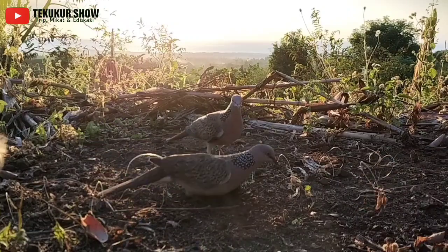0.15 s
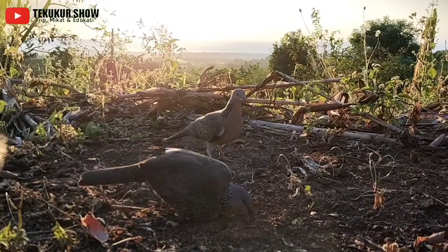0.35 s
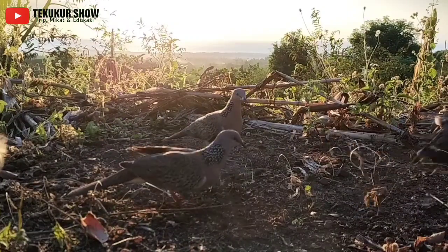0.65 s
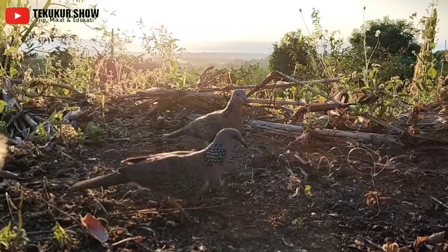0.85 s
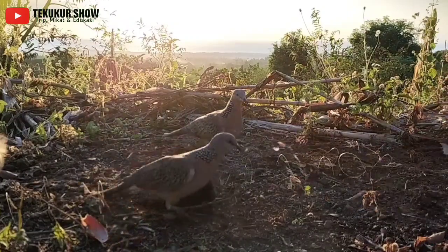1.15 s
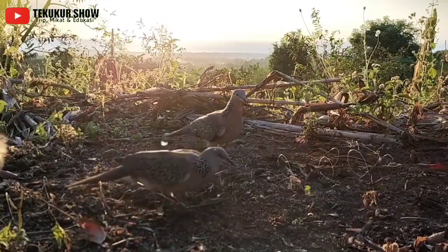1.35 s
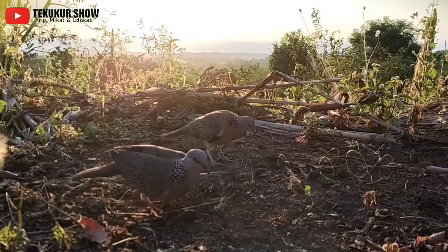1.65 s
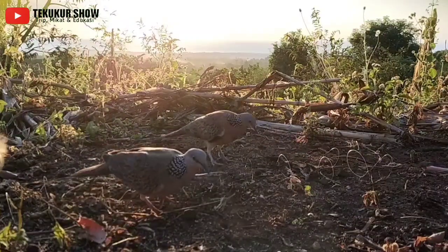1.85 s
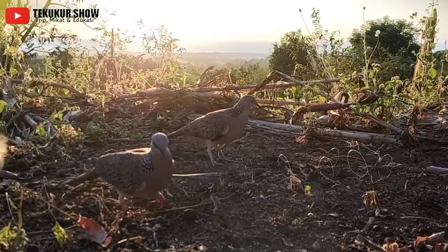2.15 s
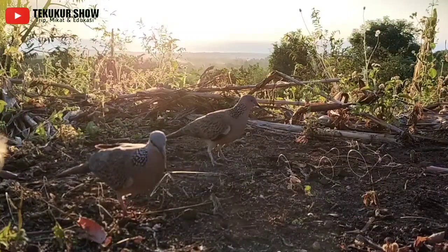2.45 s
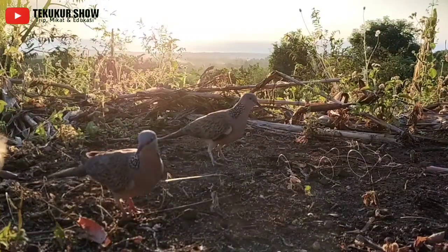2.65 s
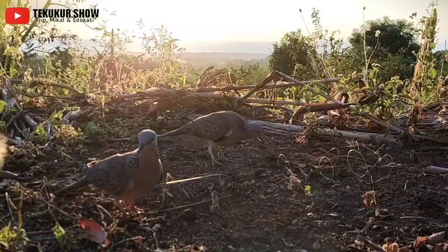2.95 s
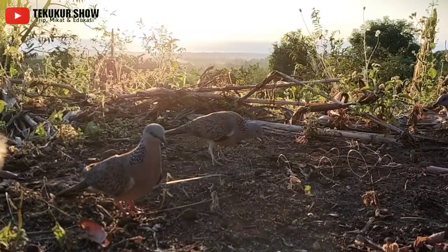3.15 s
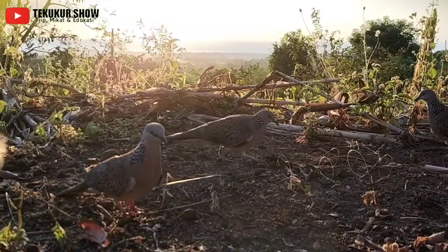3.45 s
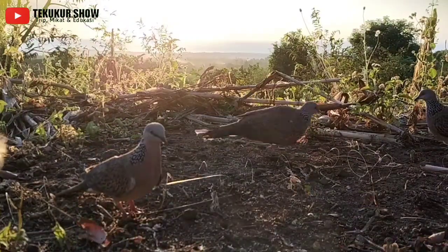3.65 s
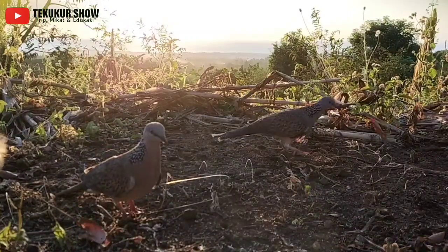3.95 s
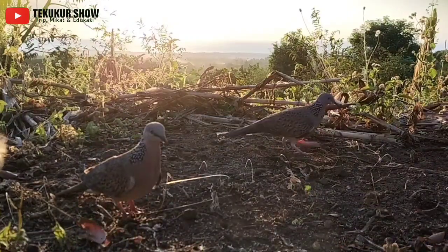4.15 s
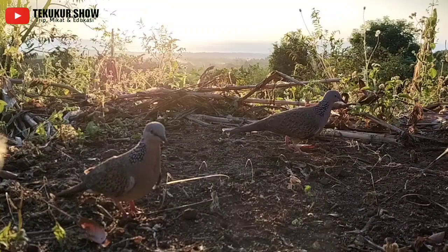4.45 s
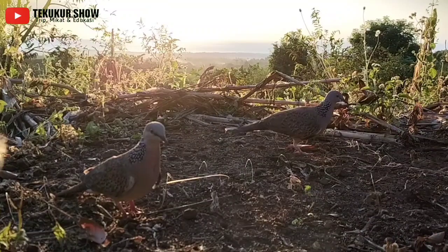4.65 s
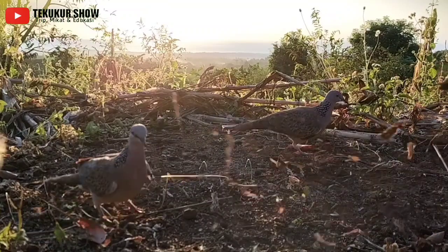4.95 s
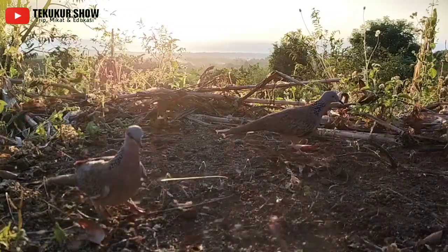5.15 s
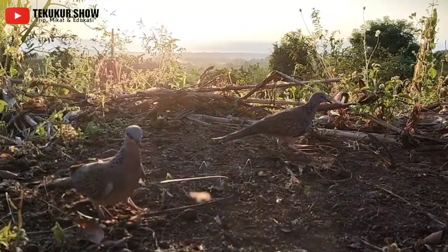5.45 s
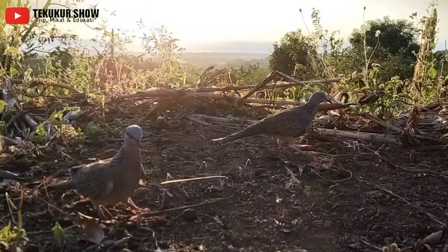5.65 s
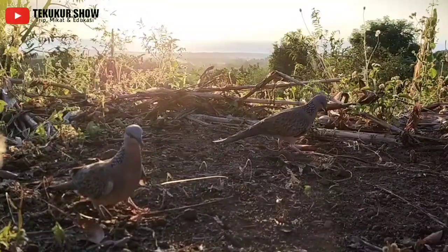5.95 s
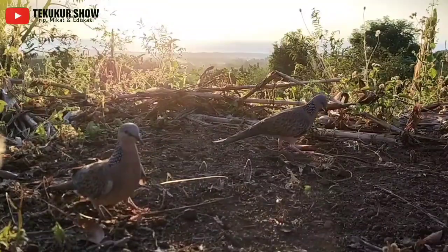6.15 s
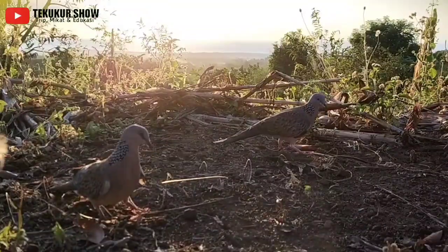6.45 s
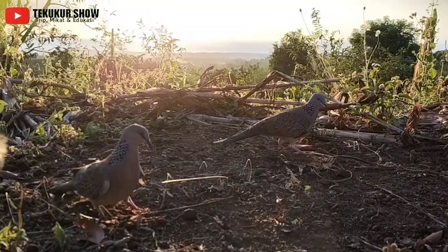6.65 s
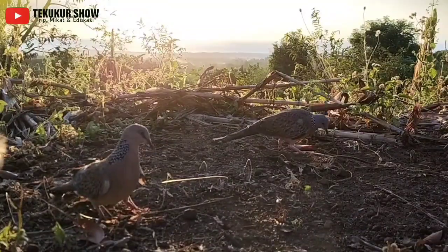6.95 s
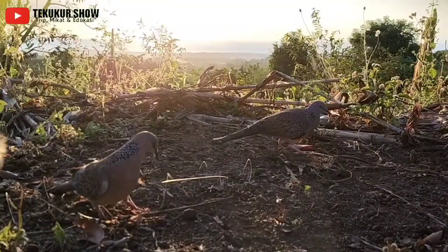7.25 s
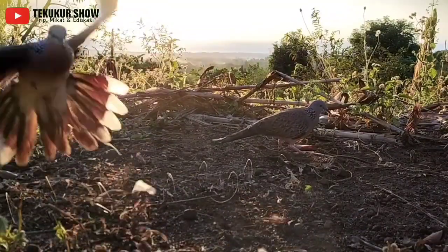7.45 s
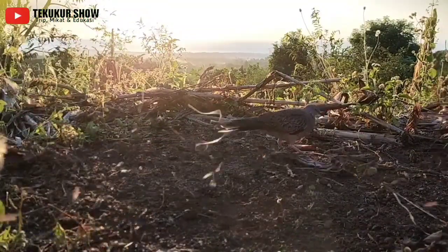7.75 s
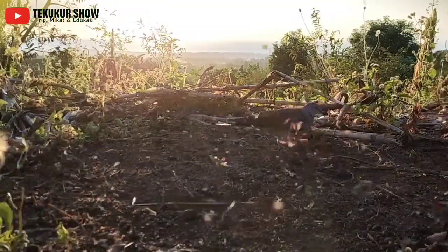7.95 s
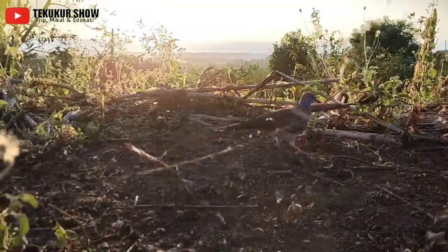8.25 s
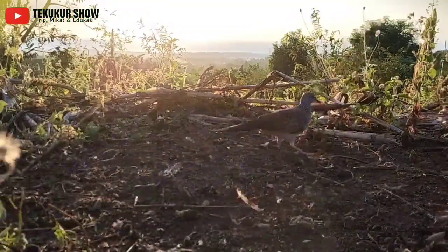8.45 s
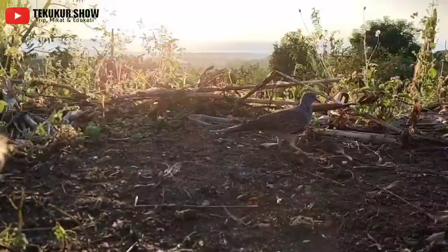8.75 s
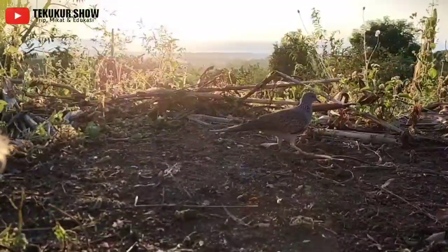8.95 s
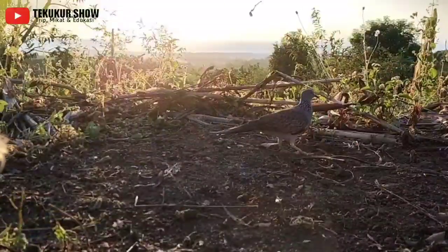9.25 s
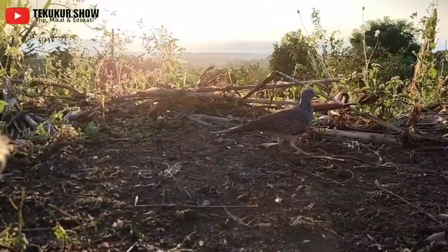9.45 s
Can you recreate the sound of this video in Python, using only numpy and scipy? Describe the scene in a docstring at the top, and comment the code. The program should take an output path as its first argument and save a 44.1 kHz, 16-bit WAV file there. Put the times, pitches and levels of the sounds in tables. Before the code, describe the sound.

Quiet outdoor valley with a low airy hum and faint hiss. Small pecks and steps, mostly slightly left, are broken by two brief flaps with papery claps and rustle. Thin far chirps, descending songbird whistles and a faint motorbike sit behind. Then comes a sudden very close takeoff: buffeting gusts, hollow wing whumps, crackling leaves and twigs, and whirring feathers that ease but continue to the end.

```python
"""Dry ground with scrub in an open valley: doves forage close by, scuffle twice, then take off on whirring wings.
Each wingbeat is a suction-then-push pulse of air with tumbling eddies and a low whump; noise bursts through
resonances make the feather claps and struck twigs, filtered noise the swish, sparse grains the rustle and
sines with hiss the piping. Gliding sines make the small birds, drifting harmonics a distant motorbike, and
coloured noise the open air."""
import sys
import numpy as np
from scipy import signal
from scipy.fft import rfft, irfft
from scipy.io import wavfile
from scipy.ndimage import uniform_filter1d

SR = 44100
rng = np.random.default_rng(int(sys.argv[2]) if len(sys.argv) > 2 else 0)


def file_out(sig):
    """Save sig as 16-bit WAV at sys.argv[1]."""
    # one column per channel
    cols = np.atleast_2d(sig).T
    # limit, then scale
    lim = np.clip(cols, -1, 1)
    pcm = np.round(lim * 32767).astype(np.int16)
    wavfile.write(sys.argv[1], SR, pcm)


N = 422919  # length in samples


# Runs of wingbeats: first beat t/s, count, period/s, first pressure level/dB, last pressure level/dB,
# suction-to-push time/ms, return stroke relative level/dB, return suction-to-push time/ms
WINGBEAT_RUNS = [(0.626, 1, 0.033, -32, -35, 8.6, -17, 9), (0.667, 2, 0.073, -23, -28, 6.3, 6, 5.8),
                 (.916, 1, 0.096, -33, -31, 17, 9, 2.2), (0.9679, 2, 0.074, -16, -20, 3.3, -19, 11),
                 (4.737, 2, 0.083, -28, -12, 9.1, -1.5, 5), (4.894, 2, 0.079, -16, -15.5, 2.8, -4, 13),
                 (5.097, 1, 0.042, -26.5, -31, 1.9, -26, 4.9), (5.764, 1, 0.067, -49, -43, 9.3, -21, 6.6),
                 (7.496, 2, 0.099, -16, -11, 13, -5, 9.9), (7.673, 2, 0.074, -14.5, -17.5, 8.8, 5, 4.6),
                 (7.82, 3, 0.07, -8.5, -10.5, 9.8, -8.5, 4), (8.032, 4, .073, -9.5, -18.5, 10.7, -42, 10),
                 (8.302, 1, 0.092, -20, -20, 4.5, -5, 11), (8.413, 5, 0.077, -21, -26.5, 6.6, -12, 7.1),
                 (8.799, 4, 0.081, -25, -20, 7.2, -5, 5.6), (9.181, 4, 0.088, -21.5, -22, 6.24, -3, 3.7),
                 (9.51, 2, 0.038, -31.5, -32, 6.4, 1, 7.7)]
UNEVEN_DB = 2  # spread of stroke strength


def wingbeats():
    """Periodic excitation: return strokes lag by half a cycle; rows (t/s, pressure level/dB, swing/ms)."""
    strokes = []
    for first_s, count, period_s, first_db, last_db, swing_ms, return_db, return_ms in WINGBEAT_RUNS:
        for s, along in zip(*evenly(first_s, count, period_s)):
            run_db = first_db + (last_db - first_db) * along
            beat_db, back_db = run_db + UNEVEN_DB * rng.standard_normal(2)
            strokes.append((s, beat_db, swing_ms))
            strokes.append((s + period_s / 2, back_db + return_db, return_ms))
    return strokes


def wing_puffs(strokes, sharpness=0.76):
    """Near-field pressure: a passing wing sucks, then pushes; also returns the air's activity (0-1)."""
    puffs, activity = np.zeros(N), np.zeros(N)
    t = np.arange(-SR // 16, SR // 16) / SR
    for s, level_db, swing_ms in strokes:
        u = t / (swing_ms / 2000)  # time in half swings
        broad = u * np.exp((1 - u * u) / 2)
        edge = 2 * u / (1 + u * u) ** 2 * np.pi / 2
        add(puffs, s + t[0], from_db(level_db) * ((1 - sharpness) * broad + sharpness * edge))
        add(activity, s + t[0], np.exp(-(t / 0.065) ** 2))
    return puffs, np.minimum(activity, 1)


# Spectrum of tumbling air at the microphone: f/Hz, relative level/dB
EDDY_SPECTRUM = [(10, -6), (30, 8.5), (60, -0.5), (120, -4), (220, -21), (450, -30), (1000, -55.5)]


def eddies(puffs, gain_db=-8.0, linger_s=0.038, growth=0.67):
    """Turbulence: air keeps tumbling over the microphone after each wingbeat, then settles."""
    r = np.exp(-1 / (linger_s * SR))
    strength = signal.lfilter([1 - r], [1, -r], np.abs(puffs))
    settled = strength / (strength + 0.0013)  # weak motion dies away faster
    return from_db(gain_db) * strength ** growth * settled * colour(rng.standard_normal(N), EDDY_SPECTRUM)


def wing_whumps(strokes, whump_hz=216.6, whump_q=0.91, length_s=0.014, growth=0.87):
    """Damped resonance: the flexing wing adds a soft, hollow whump, louder when the beat is hard."""
    swell = np.zeros(N)
    t = np.arange(-SR // 16, SR // 16) / SR
    for s, pressure_db, _ in strokes:
        level_db = -37 + growth * (pressure_db + 20)
        add(swell, s + t[0], from_db(level_db) * np.exp(-(t / length_s) ** 2))
    return swell * rms_one(resonate(rng.standard_normal(N), whump_hz, whump_q))


# Light strikes of litter thrown up by the take-off: start and end t/s, rate per_s in 1/s,
# crack, knock, sizzle and slap levels/dB before the part gains, crack and knock f/Hz, spread of level/dB
DEBRIS_SETTINGS = dict(start=7.55, end=9.59, per_s=8, crack_db=-37, crack_hz=2300, knock_hz=900, knock_db=-46, sizzle_db=-54, slap_db=-34, spread_db=2.5)


def debris():
    """Random impacts: flying litter strikes with its own strength and pitch; rows as in the clap table."""
    d, rows = DEBRIS_SETTINGS, []
    for s, (hard, small, heavy) in at_random(d):
        pitch = 2 ** np.clip(0.35 * small, -1, 1)
        hard_db, heavy_db = d["spread_db"] * hard, d["spread_db"] * heavy
        rows.append((s, d["crack_db"] + hard_db, d["crack_hz"] * pitch, d["knock_hz"] * pitch,
                     d["knock_db"] + heavy_db, d["sizzle_db"] + hard_db, d["slap_db"] + hard_db))
    return rows


# Loudest feather claps and struck twigs, levels before the part gains: t/s, nominal crack peak level/dB,
# crack f/Hz, knock f/Hz, knock level/dB, sizzle level/dB, slap peak level/dB
CLAP_EVENTS = [(0.584, -39, 3050, 900, -46, -48, -22.5), (0.614, -56, 2700, 360, -32, -64, -36),
               (0.668, -28, 2400, 426, -25.5, -37.5, -22), (0.7405, -27.5, 3370, 450, -31, -46, -20.5),
               (0.781, -39, 3450, 428, -36, -47, -26), (0.814, -44, 3750, 990, -60, -56, -31),
               (0.9663, -30, 3450, 640, -36, -36, -29), (1.039, -32.5, 3280, 604, -34, -45, -30),
               (4.801, -43, 2300, 780, -37.5, -65, -33), (4.8749, -29.5, 3100, 734, -32.5, -59, -33),
               (4.951, -48, 2450, 940, -40, -57, -24), (4.968, -30.5, 3300, 664, -32, -34, -12.5),
               (5.006, -37.5, 3400, 510, -28.5, -44, -20), (5.03, -57, 2400, 467, -34.5, -62, -31),
               (5.0759, -44, 3400, 556, -41.5, -38.5, -24), (5.0827, -32, 3700, 443, -35.5, -49, -28),
               (7.5013, -29, 2800, 500, -41.5, -36.5, -17.5), (7.556, -38, 2300, 550, -38.5, -52, -40),
               (7.653, -31, 1450, 850, -32, -55, -16), (7.7086, -19, 1710, 470, -30.5, -39, -15.5),
               (7.8227, -38, 2450, 664, -30.5, -35.5, -11), (7.929, -37, 2350, 400, -38, -39.5, -21),
               (7.9557, -23.5, 2104, 550, -37, -46, -18), (7.981, -25, 1980, 960, -25, -48, -19),
               (8.0246, -29.5, 2300, 452, -39, -43, -35), (8.1043, -42, 2300, 541, -56, -57, -37),
               (8.116, -36.5, 3000, 700, -58, -32, -33), (8.182, -26.5, 1670, 700, -46, -40, -21.5),
               (8.247, -29.5, 2020, 750, -31, -39, -23), (8.2832, -35, 1750, 760, -29.5, -58, -26),
               (8.299, -20.5, 2630, 800, -49, -43, -15), (8.3426, -29, 2830, 720, -42, -35, -24),
               (8.3577, -29, 2730, 770, -28, -48, -14), (8.422, -34, 2800, 1100, -40.5, -46, -30),
               (8.482, -28, 2100, 800, -39, -41.5, -24), (8.636, -31.5, 1890, 900, -48, -47, -30),
               (8.706, -32, 1720, 1350, -51, -70, -36), (8.745, -43, 2200, 680, -38, -68, -38),
               (8.7922, -37.5, 2252, 910, -49, -59, -25), (8.842, -38, 2240, 1000, -42, -62, -24),
               (8.865, -29.5, 2150, 1070, -36, -60, -30), (8.916, -28, 2500, 483, -34.5, -49, -19),
               (8.921, -24.5, 2700, 925, -35, -45, -27), (8.9604, -27.5, 1790, 940, -40, -44, -19),
               (9.041, -26.5, 2150, 650, -47, -52, -34), (9.071, -36, 2150, 700, -35.5, -52, -25),
               (9.1828, -26, 2620, 493, -53, -48, -29), (9.196, -28, 2000, 900, -39, -40.5, -21),
               (9.2885, -24, 2430, 970, -27.5, -32, -16.5), (9.3922, -30.5, 2600, 700, -44, -40.5, -25),
               (9.431, -21.5, 2420, 595, -46, -43, -19.5)]
CREST_DB = 11.5  # nominal crack peak above its rms
CONTACT_MS, CONTACT_AT_DB, CONTACT_HALVES_DB = 3.8, -26, 17  # a harder blow is over sooner


def feather_claps(lead_ms, pan_db, knock_gain_db=-3.0, sizzle_gain_db=-4.5, slap_gain_db=-1.0,
                  slap_width=1.38, tail_s=0.013, tail_db=-24.0, swell_db=-20.0, grain_db=7.0, top_db=-5.0):
    """Impact excitation: wing tips hit, each noise burst swelling briefly before its peak; trapped air slaps."""
    out = np.zeros((2, N))
    t = np.arange(-SR // 50, SR // 10) / SR
    for s, peak_db, crack_hz, knock_hz, knock_db, sizzle_db, slap_db in list(CLAP_EVENTS) + debris():
        contact_ms = CONTACT_MS * 2 ** ((CONTACT_AT_DB - peak_db) / CONTACT_HALVES_DB)
        u = t / (min(contact_ms, 8) / 1000)  # time in contact lengths
        impact = np.exp(-(1.38 * u - .4) ** 2) + from_db(tail_db) * np.exp(-np.abs(t) / tail_s)
        swell = from_db(swell_db) * np.exp(-np.abs(t) / 0.0082)
        white, grain = rng.standard_normal((2, 3, len(t)))
        grainy = white * from_db(grain_db * np.minimum(grain, 2))
        burst = grainy * np.where(t < 0, swell, impact)

        knock = resonate(burst[0], knock_hz, 1.0)
        crack = resonate(burst[1], crack_hz, 1.0)
        # the vanes sizzle
        sizzle = band(burst[2], 5800, 7500) + from_db(top_db) * band(burst[2], 8500, .45 * SR)
        knock = from_db(knock_db + knock_gain_db) * rms_12ms_one(knock)
        crack = from_db(peak_db - CREST_DB) * rms_12ms_one(crack)
        sizzle = from_db(sizzle_db + sizzle_gain_db) * rms_12ms_one(sizzle)

        # the slap is one pointed pulse, narrower when the knock is higher
        away = np.abs(t - .0012) * 2 * np.pi * knock_hz / slap_width
        slap = from_db(slap_db + slap_gain_db) * (away - 1) * np.exp(-away)
        lead, pan = lead_ms[round(s * SR)], pan_db[round(s * SR)]
        add(out, s + t[0], place(knock + slap, 0.57 * lead, -0.48) + place(crack + sizzle, lead, pan))
    return out


# Piping of stiff flight feathers: first t/s, count, period/s, f/Hz, first level/dB, last level/dB,
# levels before the layer gain
PIPING_RUNS = [(7.505, 1, .074, 2400, -44, -47), (7.583, 6, 0.059, 2330, -41.5, -43),
               (8.027, 4, 0.071, 2270, -37.5, -51), (7.62, 4, 0.077, 1070, -48, -38),
               (7.913, 3, 0.064, 1100, -36.5, -38), (8.211, 5, 0.072, 1080, -41, -51),
               (8.445, 2, 0.12, 2260, -49, -41), (8.618, 2, 0.28, 1320, -44, -48),
               (8.668, 2, .112, 1800, -50, -49), (9.029, 2, 0.079, 1330, -40, -36.5),
               (8.986, 7, 0.095, 1080, -44, -53), (9.49, 3, 0.041, 2150, -44, -46)]


def feather_piping(gain_db=-0.5, length_s=0.0056, sag_per_s=2.92, detune=0.0415, rough=0.79, uneven_db=0.5):
    """Aeroelastic flutter: a feather edge gives a breathy pip that sags in pitch."""
    out = np.zeros(N)
    t = np.arange(-SR // 30, SR // 30) / SR
    for first_s, count, period_s, hz, first_db, last_db in PIPING_RUNS:
        for s, along in zip(*evenly(first_s, count, period_s)):
            sharp, loud = rng.standard_normal(2)
            pitch = hz * (1 + detune * sharp - sag_per_s * t)
            tone = np.sqrt(2) * np.sin(2 * np.pi * np.cumsum(pitch) / SR)
            hiss = rms_one(resonate(rng.standard_normal(len(t)), hz, 1.2))
            level_db = gain_db + first_db + (last_db - first_db) * along + uneven_db * loud
            add(out, s + t[0], from_db(level_db) * np.exp(-(t / length_s) ** 2) * (tone + rough * hiss))
    return out


def twig_knocks(per_s=150, size_db=4.5, cycles=10, count=48):
    """Modal ringing: loose twigs and leaves knock at random, each ringing briefly at its own pitch."""
    sizes = from_db(size_db * np.minimum(rng.exponential(1, N), 2))
    hits = (rng.random(N) < per_s / SR) * sizes * rng.choice([-1, 1], N)
    dealt = rng.integers(0, count, N)  # which twig is hit
    pitches = np.concatenate([np.geomspace(650, 1200, count // 2), np.geomspace(1800, 3100, count // 2)])
    out = np.zeros(N)
    for k, hz in enumerate(pitches):
        r = from_db(-60 * hz / (cycles * SR))  # falls 60 dB in this many cycles
        w = 2 * np.pi * hz / SR
        struck = hits * (dealt == k) + 1e-18
        # higher twigs are fainter
        out += signal.lfilter([0, np.sin(w)], [1, -2 * r * np.cos(w), r * r], struck) / hz ** 0.088
    return rms_one(out)


# Stirring in the two scuffles and the take-off, one list each, before the layer gains:
# t/s, swish level/dB, rustle level/dB
STIR_CURVES = [
    [(0.0, -53.5, -67), (0.216, -68.5, -69.5), (0.434, -53.5, -63.5), (0.568, -55, -68.5),
     (0.838, -59, -62), (0.944, -52, -67.5), (1.122, -54, -65), (1.286, -62.5, -70), (1.5, -69, -70.5)],
    [(4.6, -88, -79), (4.78, -47, -68), (4.92, -48, -64), (4.96, -48, -62.5), (5.016, -46, -68),
     (5.108, -52, -61.5), (5.324, -64, -59.5), (5.576, -67.5, -66.5), (5.8, -65, -73)],
    [(7.35, -69, -70.5), (7.5, -54, -66.5), (7.69, -46.5, -55), (7.84, -32, -54), (7.99, -48, -53.5),
     (8.15, -47, -64), (8.69, -49.5, -69), (9.11, -45.5, -68), (9.59, -47.5, -68.5)],
]
# Air through the wing feathers: f/Hz, relative level/dB
SWISH_SPECTRUM = [(110, 12), (220, 2.5), (450, -7.5), (750, -8.5), (1150, -11), (1450, -9), (2200, -32.5)]
# Crackle of feathers and dry leaves: f/Hz, relative level/dB
RUSTLE_SPECTRUM = [(760, -52), (1300, -21), (1910, -15), (2400, -5), (2850, -13), (4060, -8.5), (5220, -17),
                   (7140, -14.5), (8440, -23.5), (13000, -17), (15800, -22)]
STILL_SWISH_DB, STILL_RUSTLE_DB = -66.5, -72  # below these curve levels nothing stirs


def stirring(activity, lead_ms, pan_db, knocks_db=-3.5, rustle_db=5.5, beat_db=5.0, grains_per_s=700,
             grain_db=2.5, flutter_db=5.0, stroke_db=8.0, spread_ms=0.14):
    """Flow noise and random impacts: air swishes, twigs knock, feathers and leaves crackle in clumps."""
    swish, rustle = np.zeros(N), np.zeros(N)
    t = np.arange(N) / SR
    for rows in STIR_CURVES:
        inside = (t >= rows[0][0]) & (t <= rows[-1][0])
        during = uniform_filter1d(1. * inside, SR // 40)  # soft ends
        low_db, high_db = in_time(rows)
        swish += during * gain_above(low_db, STILL_SWISH_DB)
        rustle += during * gain_above(high_db, STILL_RUSTLE_DB)
    air = from_db(beat_db * activity + 3 * drift(90)) * colour(rng.standard_normal(N), SWISH_SPECTRUM)
    out = place(swish * (air + from_db(knocks_db) * twig_knocks()), 0.77 * lead_ms, -2.4)
    for spot in (-1, 0, 1):
        hits = rng.standard_normal(N) * (rng.random(N) < grains_per_s / SR)
        grains = hits * from_db(grain_db * np.minimum(rng.exponential(1, N), 4))
        crackle = colour(grains * from_db(flutter_db * drift(90)), RUSTLE_SPECTRUM) / np.sqrt(3)
        crackle = crackle * rustle * from_db(rustle_db + stroke_db * activity)
        out += place(crackle, lead_ms + spot * spread_ms, pan_db)
    return out


# Clearest pecks and steps: t/s, nominal peak level/dB before the layer gain, left-right level/dB
TICK_EVENTS = [(0.162, -40.5, 5), (0.208, -37, 5.5), (0.358, -41, 6), (0.421, -38, 5), (0.509, -38, 6.5),
               (0.643, -37, 2), (0.878, -42.5, 2), (1.219, -40.5, 6), (2.124, -51, 5.5), (3.282, -50, 5.5),
               (3.693, -53, 4.5), (3.777, -49.5, 5), (4.112, -48.5, 5.5), (4.344, -46, 6.5),
               (5.136, -47, 4), (5.183, -37.5, 4.5), (5.374, -56, -3), (5.417, -45, 3.5),
               (5.541, -40, -4.5), (6.766, -57, 4), (7.096, -55.5, 5)]
# Faint steps in between: start and end t/s, rate per_s in 1/s, nominal peak level/dB before the layer gain,
# spread of level/dB, left-right level/dB
STEP_SETTINGS = dict(start=0, end=7.3, per_s=1.2, peak_db=-54, spread_db=2, pan_db=4)


def ticks(gain_db=3.5, ring_s=0.0013, thud_db=-8.0, thud_hz=330.0, thud_s=0.013):
    """Impact and soil damping: beaks, claws and grit tap dry litter; the soil beneath thuds softly."""
    out = np.zeros((2, N))
    t = np.arange(SR // 20) / SR
    d = STEP_SETTINGS
    steps = [(s, d["peak_db"] + d["spread_db"] * draw[0], d["pan_db"]) for s, draw in at_random(d)]
    for s, peak_db, pan_db in list(TICK_EVENTS) + steps:
        decay = np.exp(-t / ring_s) + 0.082 * np.exp(-t / 0.023)
        tap = band(rng.standard_normal(len(t)) * decay, 1160, 6300)
        thud = resonate(rng.standard_normal(len(t)) * np.exp(-t / thud_s), thud_hz, 0.56)
        sound = tap / np.abs(tap).max() + from_db(thud_db) * thud / np.abs(thud).max()
        lead_ms = np.clip(0.0575 * pan_db, -.4, .4)
        add(out, s, place(from_db(peak_db + gain_db) * sound, lead_ms, pan_db))
    return out


def chirps(rows, waver, bend=0.25):
    """Frequency modulation: each note is one gliding sine that steepens towards its end."""
    out, wobble = np.zeros(N), drift(300)
    for s, length_s, start_hz, end_hz, level_db in rows:
        u = np.linspace(0, 1, max(round(length_s * SR), 2))
        glide_hz = start_hz + (end_hz - start_hz) * (u + bend * (u ** 4 - u))
        hz = glide_hz * (1 + waver * wobble[round(s * SR):][:len(u)])
        swell = np.sqrt(8 * u * (1 - u))
        add(out, s, from_db(level_db) * swell * np.sin(2 * np.pi * np.cumsum(hz) / SR))
    return out


# Phrases of birds in the far scrub: first t/s, count, gap/s, note length/s, first f/Hz, last f/Hz,
# glide as a share of f, level/dB before the path gains
PHRASES = [(1.775, 1, .425, .055, 2980, 2980, .02, -68.5), (2.2, 1, .2, .04, 3400, 3400, .02, -75),
           (1.89, 2, .135, .095, 2880, 3400, -.14, -67.5), (2.125, 1, .2, .065, 2460, 2460, -.05, -67.5),
           (2.48, 7, .315, .19, 4260, 4290, .01, -73.5), (2.42, 2, .36, .06, 2720, 3050, .03, -72),
           (3.125, 2, .315, .06, 5700, 5400, -.18, -68), (3.245, 2, .325, .07, 5100, 5020, -.03, -66),
           (3.205, 2, .32, .055, 6950, 6780, -.01, -74), (5.785, 1, .66, .075, 3300, 3250, .03, -70),
           (6.2, 1, .2, .085, 4500, 4500, .4, -70), (6.525, 2, .165, .045, 4650, 4600, -.02, -72),
           (6.46, 3, .1, .04, 4250, 3950, -.02, -76), (6.765, 2, .205, .06, 3550, 3600, .07, -64),
           (7.05, 2, .075, .06, 2650, 2900, -.1, -69)]


def far_notes():
    """Repetition: a phrase steps one gliding note up or down; rows (t/s, length/s, f/Hz, f/Hz, level/dB)."""
    notes = []
    for first_s, count, gap_s, length_s, first_hz, last_hz, glide, level_db in PHRASES:
        for s, along in zip(*evenly(first_s, count, gap_s)):
            hz = first_hz + (last_hz - first_hz) * along
            notes.append((s, length_s, hz, hz * (1 + glide), level_db))
    return notes


# A far bird's thin trills of upward flicks: first t/s, count, gap/s, low f/Hz, high f/Hz,
# level/dB before the path gains
TRILL_RUNS = [(1.68, 20, .064, 5600, 6300, -69.5), (5.705, 10, .067, 6000, 6450, -76)]
FLICK_S = 0.0214


def trills():
    """Jittered repetition: no two flicks are alike; rows (t/s, length/s, f/Hz, f/Hz, level/dB)."""
    notes = []
    for first_s, count, gap_s, low_hz, high_hz, level_db in TRILL_RUNS:
        for s in evenly(first_s, count, gap_s)[0]:
            late, sharp, loud = rng.standard_normal(3)
            shift_hz = 110 * sharp
            notes.append((s + 0.0028 * late, FLICK_S, low_hz + shift_hz, high_hz + shift_hz, level_db + 2 * loud))
    return notes


# A nearby songbird's falling whistles: t/s, length/s, start f/Hz, end f/Hz, level/dB before the path gains
WHISTLE_NOTES = [(4.062, .07, 3900, 2600, -69), (4.255, .08, 3900, 2400, -67),
                 (4.447, .08, 3900, 2300, -65), (4.657, .086, 3950, 1950, -56),
                 (4.868, .09, 3950, 1950, -50), (5.085, .09, 3950, 1800, -53), (5.29, .09, 3900, 1850, -52),
                 (5.525, .09, 3900, 1900, -53), (6.682, .052, 3350, 2200, -69),
                 (6.843, .065, 3600, 2100, -63), (7.008, .07, 3500, 2050, -61),
                 (7.165, .082, 3750, 1950, -62), (7.33, .082, 3750, 1950, -58)]


def songbirds():
    """Direct and diffuse paths: song arrives straight and also scattered by the scrub."""
    near = chirps(WHISTLE_NOTES, waver=0.016)
    far = chirps(far_notes() + trills(), waver=0.02)
    near = from_db(-4) * place(near, 0.048, 0.58) + from_db(-2) * scatter(near, t60=0.55)
    far = from_db(-2) * place(far, 0.056, 1.) + from_db(-1) * scatter(far, t60=0.5)
    return near + far


# Motorbike through its gears: t/s, firing rate f/Hz, relative level/dB
BIKE_CURVE = [(0, 127, -4), (1.15, 130, 0), (2.05, 146, 1), (2.18, 140, -14), (2.27, 119, -10),
              (2.42, 117, 0), (2.6, 114.5, 0), (3.6, 116.5, 0), (4.7, 122, 1), (5.3, 124, -4),
              (5.55, 122, -10), (6.0, 108, -2), (6.8, 106, -1), (7.3, 104, -9)]
# Its exhaust pipe: f/Hz, level/dB of a harmonic there before the curve and the fading
EXHAUST_RESPONSE = [(100, -76), (120, -60), (140, -53), (210, -70), (235, -60), (280, -67), (320, -67),
                    (345, -75), (420, -73), (465, -65), (490, -65), (530, -81), (575, -81.5), (640, -81),
                    (800, -97)]


def motorbike(fading_db=2, jitter=0.0039, count=6):
    """Harmonic series: only low firing harmonics carry this far, each fading in the moving air."""
    hz, level_db = in_time(BIKE_CURVE)
    phase = 2 * np.pi * np.cumsum(hz * (1 + jitter * drift(25.57))) / SR
    out = np.zeros(N)
    for k in range(1, count + 1):
        harmonic_db = level_db + at_hz(EXHAUST_RESPONSE, k * hz) + fading_db * drift(10)
        out += np.sqrt(2) * from_db(harmonic_db) * np.sin(k * phase)
    return out


# Open air: f/Hz, relative level/dB
AIR_SPECTRUM = [(12, -45.5), (20, -3), (44, -7), (130, 1), (233, -5), (308, -14.5), (443, -13.5),
                (510, -21), (586, -16), (1110, -26), (4140, -29.5), (6120, -31.5), (7650, -42.5),
                (13000, -37), (15800, -38)]
# Open air: f/Hz, left-right likeness (1 the same, 0 unrelated)
AIR_LIKENESS = [(50, 0.82), (200, 0.86), (400, 0.45), (700, 0.29), (1300, 0), (15000, 0)]


def open_air(level_db=-54.5):
    """Interaural coherence: the valley's hum is alike on both sides in the bass, under a faint hiss."""
    mid, side = rfft(rng.standard_normal((2, N)))
    alike = np.clip(at_hz(AIR_LIKENESS, np.arange(N // 2 + 1) * SR / N), -1, 1)
    both = np.sqrt(1 + alike) * mid + np.sqrt(1 - alike) * side * [[1], [-1]]
    return from_db(level_db) * colour(irfft(both, N), AIR_SPECTRUM)


def from_db(db):
    """Logarithmic level: decibels to amplitude gain."""
    return 10 ** (np.asarray(db) / 20)


def gain_above(level_db, floor_db):
    """Energy subtraction: amplitude left once the floor's power is removed."""
    return np.sqrt(np.maximum(from_db(2 * level_db) - from_db(2 * floor_db), 0))


def rms_one(x):
    """Mean power: scale to rms 1."""
    return x / np.sqrt(np.mean(x ** 2) + 1e-20)


def rms_12ms_one(x):
    """Burst energy: scale so the whole energy packed into 12 ms has rms 1."""
    return x / np.sqrt(np.sum(x ** 2) / (.012 * SR))


def in_time(rows):
    """Linear interpolation: each column of a curve at every sample."""
    s, *columns = np.transpose(rows)
    return [np.interp(np.arange(N) / SR, s, c) for c in columns]


def at_hz(points, hz):
    """Logarithmic frequency scale: read a spectrum between its points."""
    f, value = np.transpose(points)
    return np.interp(np.log(np.maximum(hz, 1)), np.log(f), value)


def colour(x, spectrum):
    """Spectral shaping: weight x by a spectrum, then scale to rms 1."""
    gain = from_db(at_hz(spectrum, np.arange(N // 2 + 1) * SR / N))
    return rms_one(irfft(rfft(x) * gain, N))


def band(x, low_hz, high_hz):
    """Linear filtering: causal band-pass."""
    return signal.sosfilt(signal.butter(2, [low_hz, high_hz], "band", fs=SR, output="sos"), x)


def resonate(x, hz, q):
    """Cascaded resonance: applied twice, so that its skirts fall steeply."""
    b, a = signal.iirpeak(hz, q, fs=SR)
    return signal.lfilter(b, a, signal.lfilter(b, a, x))


def drift(rate):
    """Slow random modulation: rms 1, heading for a new value rate times a second."""
    position = np.arange(N) * rate / SR
    return rms_one(np.interp(position, np.arange(N // 20), rng.standard_normal(N // 20)))


def evenly(first_s, count, gap_s):
    """Periodicity: a run of evenly spaced times, and how far along each is (0-1)."""
    return first_s + gap_s * np.arange(count), np.linspace(0, 1, count)


def at_random(process):
    """Jittered process: scattered times at a steady mean rate, each with three normal draws."""
    slots = np.arange(process["start"], process["end"], 1 / process["per_s"])
    draws = rng.standard_normal((len(slots), 4))
    times = slots + .3 * draws[:, 0] / process["per_s"]
    return zip(np.clip(times, 0, (N - 1) / SR), draws[:, 1:])


def add(out, s, sound):
    """Superposition: mix a sound in at time s."""
    i = max(round(s * SR), 0)
    out[..., i:i + sound.shape[-1]] += sound[..., :max(N - i, 0)]


def place(x, lead_ms, pan_db):
    """Interaural time and level differences: positive values make the left sooner and louder."""
    i = np.arange(len(x))
    left, right = [np.interp(i + side * lead_ms * SR / 2000, i, x) * from_db(side * pan_db / 2)
                   for side in (1, -1)]
    return np.array([left, right])


def scatter(x, t60):
    """Diffuse scattering: a decaying return from leaves and twigs, different on each side."""
    t = np.arange(SR) / SR
    tail = rng.standard_normal((2, SR)) * from_db(-60 * t / t60)
    return signal.fftconvolve(np.atleast_2d(x), tail / np.sqrt(np.sum(tail ** 2) / 2), axes=1)[:, :N]


# Where the wings are: t/s, lead of the left ear/ms, left-right level/dB
WING_BEARING = [(.6, -0.24, 4.5), (1.1, 0.15, 5), (4.8, -0.19, 5.5), (5.2, 0.17, 4), (7.5, -0.27, 5.5),
                (7.8, 0.3, 2), (8.2, 0.42, 3), (9.5, 0.36, 1.5)]


def scene(litter_db=-4.0):
    """Superposition: doves close by, sharper sounds scattered by twigs; birds and a motorbike beyond."""
    lead_ms, pan_db = in_time(WING_BEARING)
    strokes = wingbeats()
    puffs, activity = wing_puffs(strokes)
    wings = place(puffs + eddies(puffs) + wing_whumps(strokes), lead_ms, 0.92)
    feathers = feather_claps(lead_ms, pan_db) + place(feather_piping(), lead_ms, -1.5)
    feathers_and_litter = feathers + stirring(activity, lead_ms, pan_db) + ticks()
    twigs = from_db(litter_db) * scatter(band(feathers_and_litter, 540, .45 * SR), t60=0.11)
    return wings + feathers_and_litter + twigs + songbirds() + motorbike() + open_air()


CUTOFF_HZ = 15700


def record(dry):
    """Band limitation: an elliptic low-pass cuts the top steeply."""
    return signal.sosfilt(signal.ellip(12, .1, 80, CUTOFF_HZ, fs=SR, output="sos"), dry)


dry = scene()
out = record(dry)
file_out(out)
```